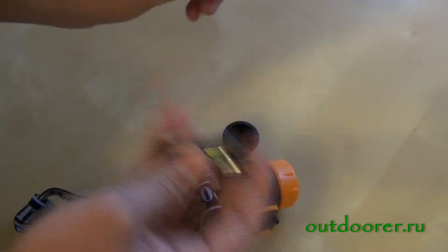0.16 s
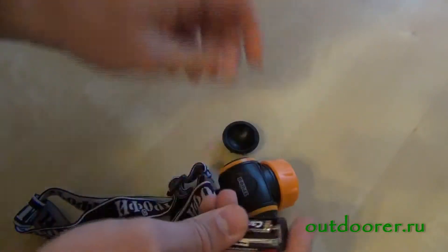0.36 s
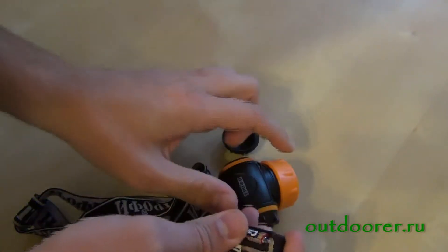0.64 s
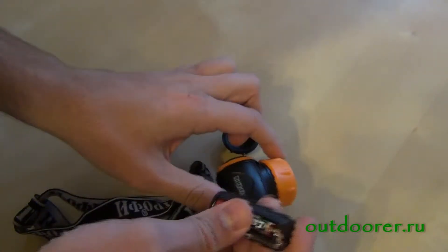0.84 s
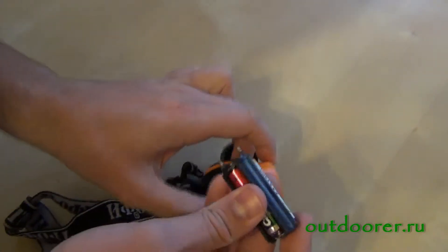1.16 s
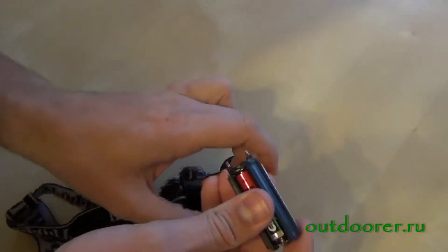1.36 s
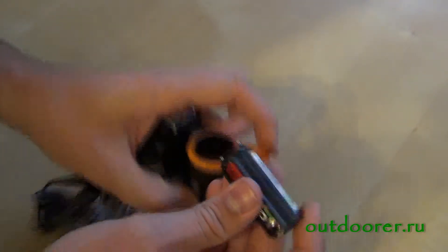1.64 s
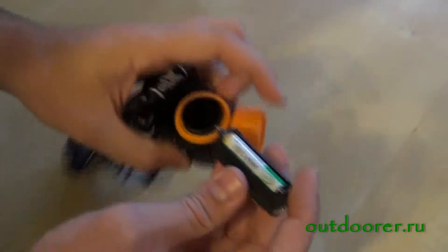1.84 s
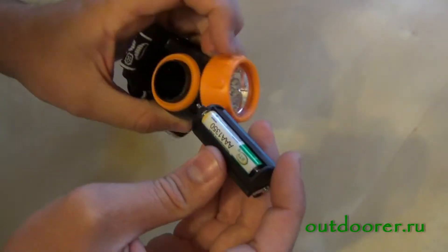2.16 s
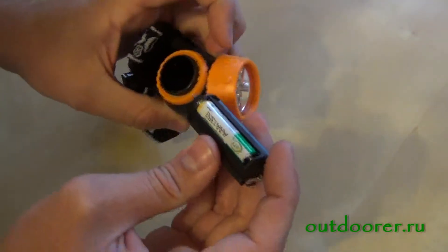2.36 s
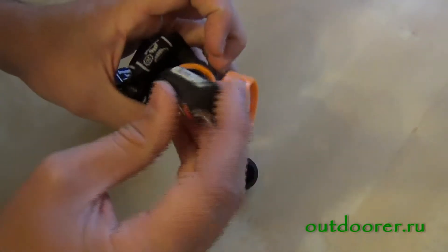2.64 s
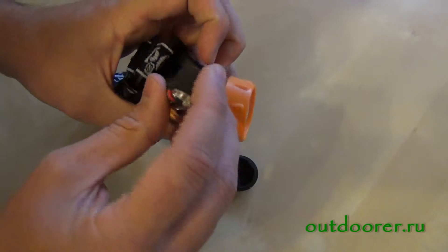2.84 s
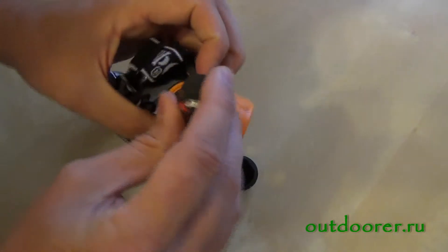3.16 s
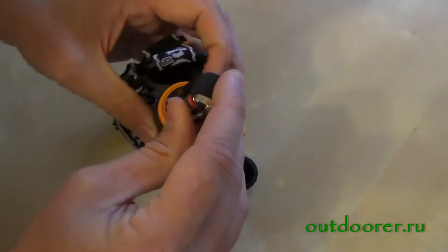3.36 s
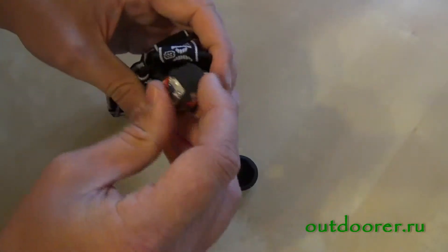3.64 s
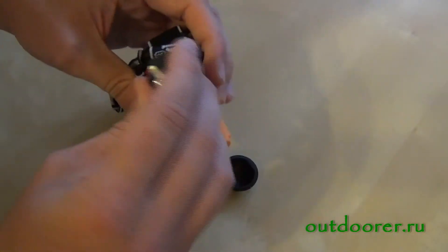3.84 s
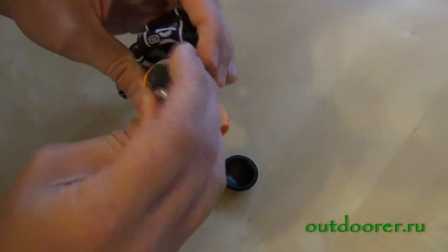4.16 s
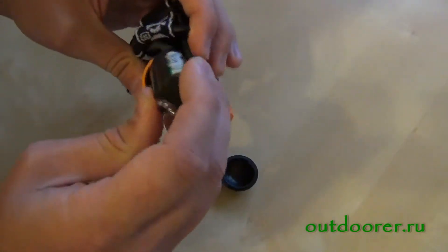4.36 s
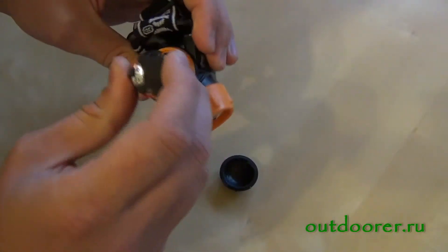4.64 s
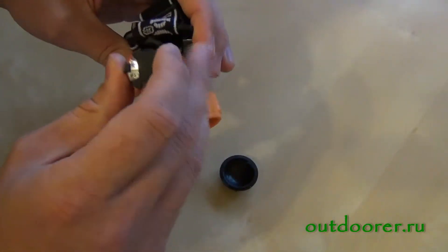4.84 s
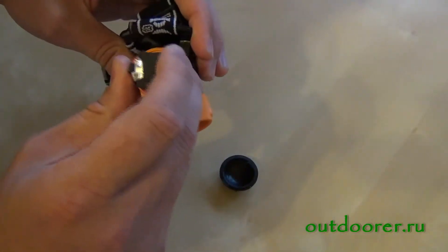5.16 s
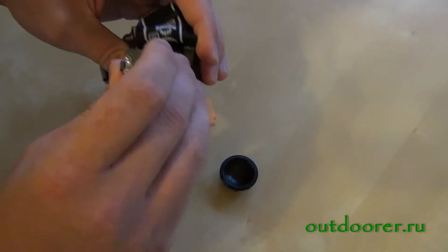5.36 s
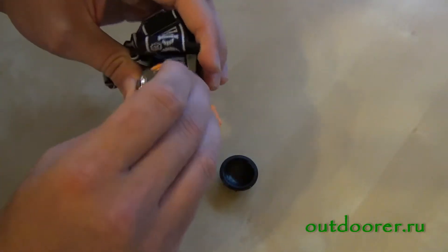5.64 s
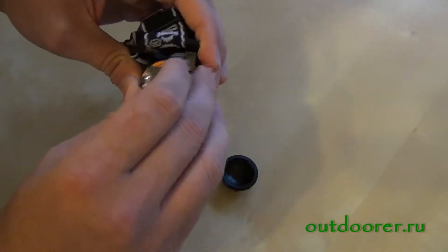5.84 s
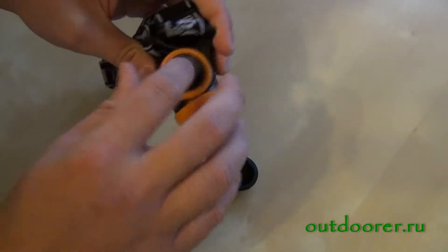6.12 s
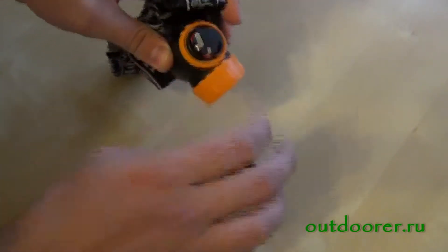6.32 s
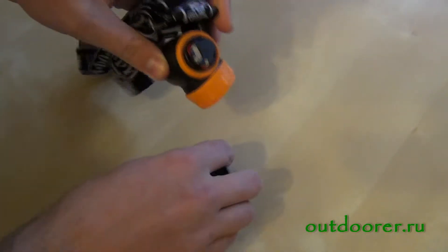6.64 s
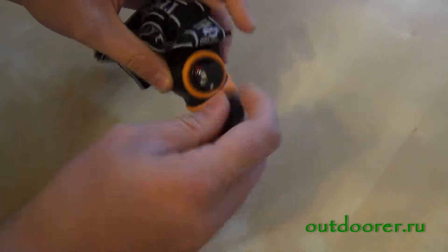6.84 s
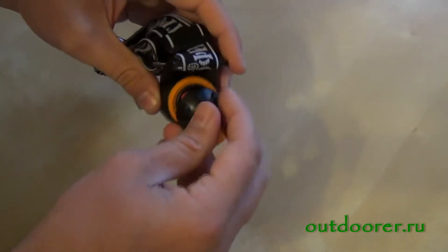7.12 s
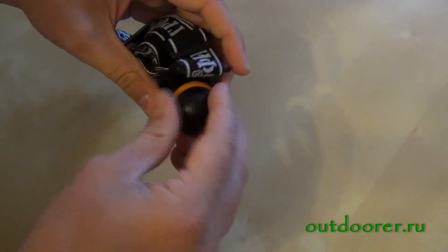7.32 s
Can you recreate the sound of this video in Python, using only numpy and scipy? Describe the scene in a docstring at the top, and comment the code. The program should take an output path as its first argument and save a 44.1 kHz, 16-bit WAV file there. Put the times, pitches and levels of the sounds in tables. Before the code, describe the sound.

Close up in a small room, a plastic lamp is dragged and knocked on a resonant table with a brief squeak as it is lifted. A battery holder then clicks and rubs inside its hollow tube, seating with a loud crisp clack. A small cap rattles off the table and snaps over its thread. Faint hiss and fan whirr lie behind.

```python
"""Battery holder fitted into a headlamp

Hands fit a plastic battery holder into a headlamp over a table, close to a camera in a small room.
The holder's clicks are short noise forces on broad resonances plus damped sines for the lamp's tube;
rubs and drags are uneven sliding forces; knocks, drags and a squeal sound as lamp and cap are handled on
the table, which booms and rings. Late on, the cap snaps over its thread. Diffuse tails give the room.
Behind it are a faint fan (a narrow noise band) and the camera's shaped hiss and thin whistle (sines)."""
import sys
import numpy as np
from scipy import signal
from scipy.fft import rfft, irfft, next_fast_len
from scipy.io import wavfile
from scipy.ndimage import uniform_filter1d, map_coordinates

SR = 44100
rng = np.random.default_rng(int(sys.argv[2]) if len(sys.argv) > 2 else 0)


def materialize(psi):
    """Save the field psi as 16-bit PCM at rate SR to the path in sys.argv[1].

    A 1-D psi becomes a single channel; in a 2-D psi each row is a channel.
    """
    bounded = np.clip(np.atleast_2d(psi).T, -1, 1)
    quanta = np.round(bounded * 32767).astype(np.int16)
    wavfile.write(sys.argv[1], SR, quanta)


N = 330298

# Broad, well damped resonances of the plastic parts, called the hollow, body, snap and tick zones.
# Each row: centre in Hz, width in Hz, t60 of the force in a click in seconds (clicks retune the tick zone).
SHELL_ZONES = [(718, 450, 0.014), (1525, 930, 0.032), (3480, 3030, 0.0059), (8800, 4650, 0.012)]
# Lowest modes of the table top. Each row: frequency in Hz, relative level in dB, t60 in seconds.
TOP_MODES = [(130, -20, .3), (284, -3, .25), (304, 0, .45), (340, -3, .25)]
# Resonances of the lamp touching the table (the cap's are scaled up). Each row: centre in Hz, width in Hz.
CONTACT_ZONES = [(800, 437), (1650, 1700), (2750, 1160), (6600, 6500)]
# The holder's place in the tube sets two pitches. Each row: time in seconds, tube ring in Hz, tick in Hz.
SEAT_PITCHES = [(3, 1460, 6900), (3.43, 1530, 8400), (4.1, 1575, 6760), (4.75, 1480, 8150),
                (5.55, 1383, 7100), (6.139, 1632, 8270)]
TABLE_ZONES_HZ = [TOP_MODES[2][0]] + [hz for hz, _ in CONTACT_ZONES]  # the top's boom, then the four zones
TOP_HZ = 16400  # upper band limit


def amp(db):
    """Level to amplitude: 20 dB is a factor of ten."""
    return 10 ** (np.asarray(db) / 20)


def unit(x):
    """Normalization: scale to rms 1."""
    return x / np.sqrt(np.mean(x ** 2) + 1e-20)


def along(points, hz):
    """Logarithmic frequency scale: read (Hz, value) points by interpolation."""
    f, v = np.transpose(points)
    return np.interp(np.log(hz + 1), np.log(f + 1), v)


def filtered(x, response):
    """Linear filtering: multiply the spectrum by a response of frequency."""
    size = next_fast_len(N + SR // 2)
    return irfft(rfft(x, size) * response(np.fft.rfftfreq(size, 1 / SR)), size)[..., :N]


def resonate(x, hz, width_hz):
    """Resonance: a causal band-pass lets a broad zone around hz sound."""
    edges = np.clip([hz - width_hz / 2, hz + width_hz / 2], 60, SR * .49)
    return signal.lfilter(*signal.butter(2, edges, 'bandpass', fs=SR), x)


def add(track, s, sound):
    """Superposition: mix a sound into the track at time s."""
    part = track[max(round(s * SR), 0):][:len(sound)]
    part += sound[:len(part)]


def ping(hz, decay_s, t):
    """Free damped vibration: one decaying mode of energy 1."""
    mode = np.sin(2 * np.pi * hz * t) * np.exp(-t / decay_s)
    return mode / np.linalg.norm(mode)


def contact(forces, levels_db, zones):
    """Forced vibration: a rough contact force drives each resonance up to its own energy."""
    sound = 0
    for force, db, (hz, width_hz, *_) in zip(forces, levels_db, zones):
        ring = resonate(force * rng.standard_normal(len(force)), hz, width_hz)
        sound = sound + amp(db) * ring / np.linalg.norm(ring)
    return sound


def stroke(length, grain_db, slips_hz, catch_db=0, catches_hz=60):
    """Dry friction: a swell of force, unevened by fast random slips and slower catching and letting go."""
    t = np.arange(int(length * SR)) / SR

    def uneven(hz):
        return map_coordinates(rng.standard_normal(int(length * hz) + 4), [t * hz], order=1)

    swell = np.abs(np.sin(np.pi * t / length))
    return swell * amp(grain_db * uneven(slips_hz) + catch_db * uneven(catches_hz))


def shares(levels_db):
    """Conservation of energy: shift zone levels so that together they hold energy 1."""
    return levels_db - 10 * np.log10(np.sum(amp(levels_db) ** 2))


def shell_levels(db, hardness, colour_db):
    """Contact stiffness: harder contacts favour the higher zones of the shell."""
    octaves = np.log2([hz for hz, *_ in SHELL_ZONES])
    return db + shares(np.array(colour_db) + hardness * octaves)


def room(x, build_s, blur_hz=380):
    """Diffuse reverberation: a stereo noise tail in which each frequency dies at its own speed."""
    # Reverberation time. Each row: frequency in Hz, t60 in seconds.
    reverb_times = [(200, 1), (530, 0.48), (1400, 0.5), (3700, 0.46), (9700, 0.3)]
    # Spectral balance of the tail. Each row: frequency in Hz, relative level in dB.
    tail_colour = [(150, -2), (600, 10.5), (2000, 1.5), (5000, 2), (9000, 0.5), (13000, 1)]
    hz, t, z = signal.stft(rng.standard_normal((2, SR // 2)), SR, nperseg=256)
    t60 = np.maximum(along(reverb_times, hz), .05)[:, None]
    z = z * 1000 ** (-t / t60) * amp(along(tail_colour, hz))[:, None]
    tail = signal.istft(z, SR, nperseg=256)[1]
    tail *= 1 - np.exp(-np.arange(tail.shape[1]) / SR / build_s)
    mid, side = tail / np.linalg.norm(tail[0]) * [[1], [amp(-19)]]
    # the walls hear the object from every side, so the notches of any one direction fill in
    lead = SR // 200
    spectrum = rfft(np.pad(x, lead))
    power = np.abs(spectrum) ** 2
    smooth = np.abs(uniform_filter1d(power, int(blur_hz * len(x) / SR) + 1))
    radiated = irfft(spectrum * np.sqrt(smooth / (power + smooth / 20 + 1e-30)))
    return signal.fftconvolve(radiated[None], np.array([mid + side, mid - side]), axes=1)[:, lead:]


def add_in_room(track, s, sound, wet_db, build_s):
    """Direct and reverberant field: mix a sound and its own room tail into both channels."""
    for channel, tail in zip(track, room(sound, build_s)):
        add(channel, s, sound)
        add(channel, s, amp(wet_db) * tail)


def background(hiss_db=-59, fan_db=-69, fan_hz=928, fan_width_hz=70, whistle_db=0):
    """Stationary noise and tones: partly coherent room air and hiss, a fan's narrow whirr, a line whistle."""
    # Spectrum of air and hiss. Each row: frequency in Hz, relative density in dB (hiss_db sets the total).
    noise_floor = [(15, -27), (30, -10), (80, -6.5), (210, -6), (450, -11), (700, -9), (950, -9),
                   (1600, -15), (4000, -17.5), (8500, -19.5), (11000, -23.5), (15000, -25)]
    # Coherence of the channels. Each row: frequency in Hz, left-right likeness (1 is identical).
    likeness = [(60, 0.64), (180, 0.76), (550, 0.8), (1650, 0.99), (4970, 1), (15000, 0.98)]
    # The camera's line whistle. Each row: frequency in Hz, rms level in dB ahead of the left-right lean.
    whistle_lines = [(15575, -81), (15625, -75), (15675, -82)]

    def mid_side(hz):
        turn = np.arccos(np.clip(along(likeness, hz), -1, 1)) / 2
        return amp(along(noise_floor, hz)) * [np.cos(turn), np.sin(turn)]

    mid, side = filtered(rng.standard_normal((2, N)), mid_side)
    hiss = unit(np.array([mid + side, mid - side]))
    fan = unit(resonate(rng.standard_normal(N), fan_hz, fan_width_hz))
    t = np.arange(N) / SR
    whistle = 0
    for hz, db in whistle_lines:
        whistle = whistle + amp(db) * np.sqrt(2) * np.sin(2 * np.pi * (hz * t + rng.random()))
    return amp(hiss_db) * hiss + amp(fan_db) * fan + amp(whistle_db) * whistle


def rubs(wet_db=-9):
    """Sliding friction: fingers, strap and holder drive the lamp's shell with an uneven force."""
    # Each row: start in seconds, length in seconds, energy in dB, hardness in dB per octave.
    slides = [(0.028, 0.048, -18.5, 2), (0.221, 0.11, -26.5, 1.5), (.655, 0.05, -27.5, 2),
              (1.587, 0.4, -18.5, 1.8), (1.949, 0.14, -18.5, 0.9), (3.128, .085, -18, -1),
              (3.361, 0.06, -14.5, 0), (3.404, 0.31, -18.5, -0.5), (3.876, 0.03, -23.5, 3.5),
              (4.758, 0.036, -16, 9), (4.934, 0.23, -20, 4.5), (5.658, 0.07, -11.5, 1),
              (5.697, 0.029, -8.5, 2.5), (5.786, 0.12, -17.5, 3.1), (5.942, 0.027, -25, 0.8),
              (6.122, 0.036, -2, 3.8), (6.843, 0.072, -24, 2), (6.96, 0.077, -25, 0),
              (7.28, 0.041, -13, 3.5)]
    # Energy balance of the hollow, body, snap and tick zones in dB.
    rub_colour = [-1, -0.5, -5, -1.5]
    track = np.zeros((2, N))
    for s, length, db, hardness in slides:
        force = stroke(length, grain_db=5.5, slips_hz=500, catch_db=4.5)
        levels_db = shell_levels(db, hardness, rub_colour)
        rub = contact([force] * len(SHELL_ZONES), levels_db, SHELL_ZONES)
        add_in_room(track, s, rub, wet_db, build_s=0.012)
    return track


def seat(s):
    """Position-dependent resonance: tube ring and tick pitch for the holder's place at time s."""
    when, *pitches = np.transpose(SEAT_PITCHES)
    return [np.interp(s, when, hz) for hz in pitches]


def add_click(track, s, levels_db, rings, wet_db, thud_db, echo_s=0.0097, echo_db=-19, crack_db=-20,
              thud_hz=410, rise_s=0.00032):
    """Impact of hard plastics: a crack, brief rings (Hz, dB, decay s), a recoil and one echo from the ceiling."""
    t = np.arange(SR // 25) / SR
    forces = [1000 ** (-t / t60) * (1 - np.exp(-t / rise_s)) for _, _, t60 in SHELL_ZONES]
    tick_hz = seat(s)[1]
    # lower ticks ring more narrowly
    tick_width_hz = SHELL_ZONES[-1][1] * (tick_hz / SEAT_PITCHES[-1][-1]) ** 2
    zones = list(SHELL_ZONES[:-1]) + [(tick_hz, tick_width_hz)]
    click = contact(forces, levels_db, zones)
    click += sum(amp(db) * ping(hz, decay_s, t) for hz, db, decay_s in rings)
    click += amp(levels_db[0] + thud_db) * ping(thud_hz, 0.0026, t)  # the whole lamp recoils in the hand
    crack = rng.standard_normal(len(t)) * np.exp(-t / 0.000078)
    click += amp(levels_db[-1] + crack_db) * crack / np.linalg.norm(crack)
    add(click, echo_s, amp(echo_db) * click)
    add_in_room(track, s, click, wet_db, build_s=0.0017)


def clicks(tube_decay_s=0.0035, thud_db=-6, thud_per_hardness_db=-1.6):
    """Modal excitation: hard catches reach the tube's upper modes, soft pushes make the lamp recoil."""
    # The holder strikes the tube. Each row: start in seconds, energy in dB, hardness in dB per octave,
    # tube ring in dB against the contact.
    catches = [(0.3666, -24, 0.5, -27), (2.0402, -25, -2, 2.5), (3.0223, -13, 0.3, -11),
               (3.0362, -17, -2, -1.5), (3.2294, -9, -0.5, -24), (3.4296, -6, 6, -1.5),
               (3.9522, -23.5, 1, -8), (3.9648, -16.5, -1, -9), (4.0732, -13.5, 3, -13),
               (4.0781, -1, 9, -29.5), (4.0918, -14, -1, 0), (4.1234, -16.5, 4, -11),
               (4.7486, -15.5, 7.5, -29), (4.7788, -16, 9.5, -18), (4.7812, -20, -4.5, -12),
               (5.107, -14, 7.5, -27), (5.353, -15.5, -1.5, -1.5), (5.3639, -12, -1.5, -9),
               (5.5451, -11.5, 2, 2), (5.6981, -13, 1.5, 2), (6.1276, -13, 0, -6), (6.1428, -1, 2.7, 0),
               (6.1446, 3.5, 4.5, -13), (6.1483, 2, 4.5, -9)]
    # Energy balance of the hollow, body, snap and tick zones in dB.
    click_colour = [2, -0.5, -3, 0]
    # Modes of the tube. Each row: multiple of the tube's ring, level in dB before hardness tilts it.
    tube_modes = [(1, 2), (1.58, -10), (2.4, -15.5)]
    track = np.zeros((2, N))
    for s, db, hardness, ring_db in catches:
        tube_hz = seat(s)[0]
        rings = []
        for ratio, mode_db in tube_modes:
            level_db = db + ring_db + mode_db + hardness * np.log2(ratio)
            rings.append((tube_hz * ratio, level_db, tube_decay_s / ratio))
        levels_db = shell_levels(db, hardness, click_colour)
        recoil_db = thud_db + thud_per_hardness_db * hardness
        add_click(track, s, levels_db, rings, wet_db=-11.5, thud_db=recoil_db)
    return track


def table_ring(blow):
    """Modal synthesis: the blow is convolved with the table's decaying higher modes."""
    # Each row: frequency in Hz, relative gain in dB, t60 in seconds.
    ring_modes = [(470, 9, .35), (587, 13, .4), (700, 10, .4), (751, 10, .45), (806, 6, .3), (936, 8, .35),
                  (1419, 8, .4), (2154, 6, .3), (2380, 5, .3), (2857, 5, .25)]
    t = np.arange(SR // 2) / SR
    modes = 0
    for hz, db, t60 in ring_modes:
        gain = amp(db) * 2 * np.log(1000) / (t60 * SR)  # evens out the build-up of long and short modes
        modes = modes + gain * np.sin(2 * np.pi * hz * t) * 1000 ** (-t / t60)
    return signal.fftconvolve(blow, modes)


def add_on_table(track, s, force, boom_db, levels_db, wet_db, ring_db, cap_from_s=6, cap_scale=1.05):
    """Coupled vibration: a force makes the plastic sound, the top boom and ring, and the room answer."""
    t = np.arange(SR // 2) / SR
    scale = cap_scale if s > cap_from_s else 1  # later it is the small cap, which rings higher than the lamp
    blow = contact([force] * len(CONTACT_ZONES), levels_db, scale * np.array(CONTACT_ZONES))
    add_in_room(track, s, blow, wet_db, build_s=0.00071)
    top = sum(amp(db) * np.cos(2 * np.pi * hz * t) * 1000 ** (-t / t60) for hz, db, t60 in TOP_MODES)
    rough_force = force * rng.standard_normal(len(force))
    boom = signal.fftconvolve(resonate(rough_force, 290, 400), top)
    ring = table_ring(blow)
    for channel in track:
        add(channel, s, amp(boom_db) * boom / np.linalg.norm(boom))
        add(channel, s, amp(ring_db) * ring)


def drags(skirt_db_per_octave=8.5, boom_db=4):
    """Selective excitation: lamp and cap skid on the table, loudest in zones near the judder's pitch."""
    # Each row: start in seconds, length in seconds, energy in dB, pitch in Hz about which zones are favoured.
    skids = [(0.811, 0.036, -19.5, 386), (0.956, 0.066, 3.5, 404), (1.113, 0.073, -1, 342),
             (1.172, 0.05, 4, 1580), (1.252, .056, 0.5, 1050), (1.337, .07, -5.5, 800),
             (1.434, 0.067, -5, 350), (1.481, .054, 6, 736), (6.599, 0.019, 1.5, 970),
             (6.63, 0.033, -3, 1100)]
    track = np.zeros((2, N))
    for s, length, db, judder_hz in skids:
        drive_db = -skirt_db_per_octave * np.abs(np.log2(np.array(TABLE_ZONES_HZ) / judder_hz))
        drive_db[0] += boom_db  # the top booms readily at any pitch
        low_db, *levels_db = db + shares(drive_db)
        force = stroke(length, grain_db=0.5, slips_hz=588)
        add_on_table(track, s, force, low_db, levels_db, wet_db=-9.5, ring_db=-2.5)
    return track


def knock_levels(db, contact_ms, steepness=6):
    """Finite contact time: a blow hardly drives zones that vibrate faster than it lasts."""
    # Levels in dB: the top's boom, then the four contact zones.
    knock_colour = [-1, -3.5, 1.9, 1, 2.8]
    cycles = np.array(TABLE_ZONES_HZ) * contact_ms / 10 ** 3
    return db + np.array(knock_colour) - 10 * np.log10(1 + cycles ** steepness)


def knocks(blow_s=0.0068, rebound_s=.0031, rattle_db_per_ms=-15, rattle_dulls=1.27):
    """Impact and rebound: one sharp blow, a short flight, then a duller rattle that dies away."""
    # Lamp and cap strike the table. Each row: start in seconds, strength in dB, contact time of the blow
    # in milliseconds, t60 of the rattle in seconds.
    strikes = [(1.046, -4, 2.14, 0.023), (1.1648, -4, 0.2, 0.065), (1.3104, -1, 0.45, 0.019),
               (1.5378, -20, 0.17, 0.0037), (6.6156, -2, 0.058, 0.049), (6.651, -5.5, 0.16, .004),
               (6.6577, -2.5, 0.17, 0.022)]
    track, t = np.zeros((2, N)), np.arange(SR // 20) / SR
    for s, db, contact_ms, rattle_s in strikes:
        rattle_db = db + rattle_db_per_ms + 10 * np.log10(rattle_s * 10 ** 3)  # longer rattles hold more energy
        blow = (s, blow_s, knock_levels(db, contact_ms))
        rattle = (s + rebound_s, rattle_s, knock_levels(rattle_db, contact_ms * rattle_dulls))
        for start, t60, (boom_db, *levels_db) in (blow, rattle):
            force = 1000 ** (-t / t60)
            add_on_table(track, start, force, boom_db, levels_db, wet_db=-5.0, ring_db=3)
    return track


def squeal(wet_db=-15):
    """Stick-slip squeal: uneven friction as the lamp is lifted drives a few of its narrow resonances."""
    # Start in seconds, length in seconds.
    s, length = (1.493, 0.054)
    # Each row: centre in Hz, width in Hz, energy in dB.
    squeal_modes = [(2030, 240, -4), (3930, 180, -13), (5030, 200, -17.5)]
    track = np.zeros((2, N))
    forces = [stroke(length, grain_db=7, slips_hz=500)] * len(squeal_modes)
    sound = contact(forces, [db for *_, db in squeal_modes], squeal_modes)
    add_in_room(track, s, sound, wet_db, build_s=0.0043)
    return track


def snaps(cap_hz=3610, cap_db=2, cap_decay_s=0.0013, tube_db=-3, tube_decay_s=0.0028):
    """Impulsive excitation: the cap jumps over its thread and rings briefly, with a little of the tube."""
    # Each row: start in seconds, energy in dB, hardness in dB per octave.
    jumps = [(7.0728, -24.5, -5.5), (7.146, -2.5, 3), (7.183, -4, -1), (7.3006, -15, 4), (7.3052, -7, -1.5),
             (7.3159, 3.5, 9), (7.4663, -18.5, -8.5)]
    # Energy balance of the hollow, body, snap and tick zones in dB.
    snap_colour = [-16.5, -8.5, 0, -7.5]
    track = np.zeros((2, N))
    for s, db, hardness in jumps:
        levels_db = shell_levels(db, hardness, snap_colour)
        _, body_db, snap_db, _ = levels_db
        cap_ring = (cap_hz, snap_db + cap_db, cap_decay_s)
        tube_ring = (seat(s)[0], body_db + tube_db, tube_decay_s)
        add_click(track, s, levels_db, [cap_ring, tube_ring], wet_db=-10.5, thud_db=-29)
    return track


def scene():
    """Superposition at a stereo microphone: the hands work almost straight ahead, over the background."""
    # Microphone response. Each row: frequency in Hz, gain in dB.
    microphone = [(100, -8), (6500, 0.5), (8400, 3), (9700, -4.5), (11000, -12.5), (16000, -7)]
    # Mismatch of the two microphone ports. Each row: frequency in Hz, side against mid in dB.
    port_mismatch = [(500, -19.5), (2500, -24), (4200, -29), (6300, -6.5), (9000, -23)]
    # The background is stronger on the left. Each row: frequency in Hz, left against right in dB.
    left_lean = [(100, 3), (400, 2.3), (1500, 0.3), (10000, 0.3)]
    handling = rubs() + clicks() + drags() + knocks() + squeal() + snaps()
    handling = filtered(handling, lambda hz: amp(along(microphone, hz)))
    # a quarter-period phase shift (1j) sets the side signal apart from the mid
    side = filtered(handling.mean(axis=0), lambda hz: 1j * amp(along(port_mismatch, hz)))
    air = filtered(background(), lambda hz: amp(np.outer([.5, -.5], along(left_lean, hz))))
    return handling + np.array([side, -side]) + air


def record(dry):
    """Band limitation: the camera keeps only frequencies below its limit."""
    return filtered(dry, lambda hz: hz < TOP_HZ)


dry = scene()
out = record(dry)
materialize(out)
```